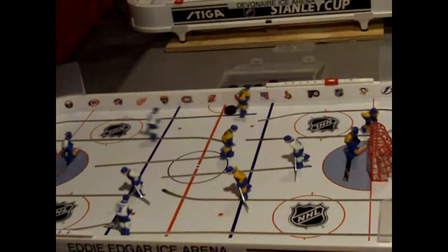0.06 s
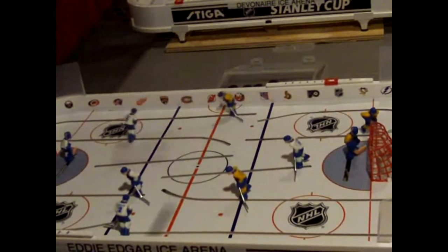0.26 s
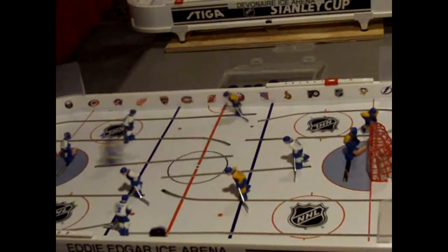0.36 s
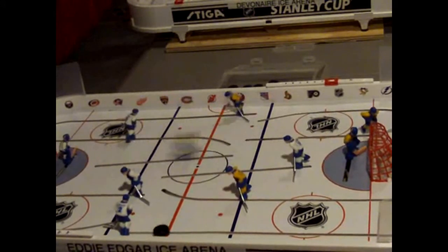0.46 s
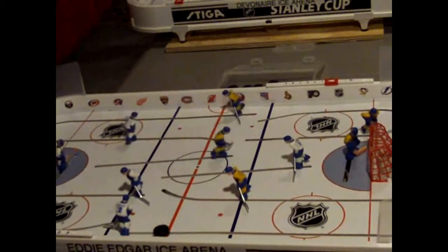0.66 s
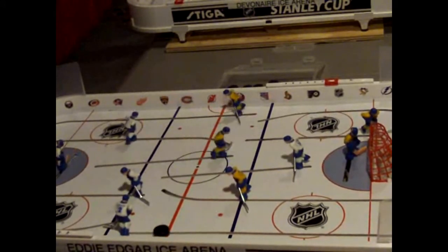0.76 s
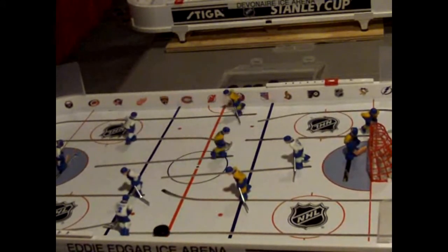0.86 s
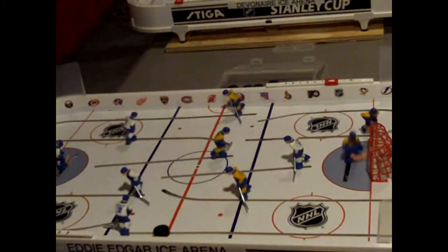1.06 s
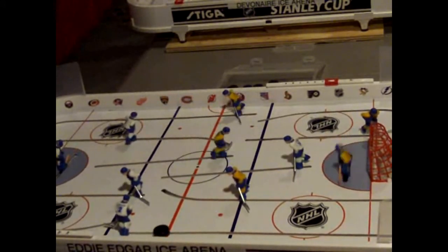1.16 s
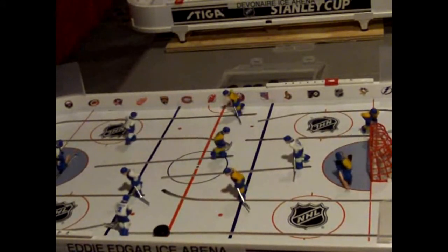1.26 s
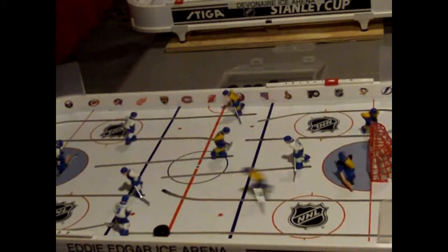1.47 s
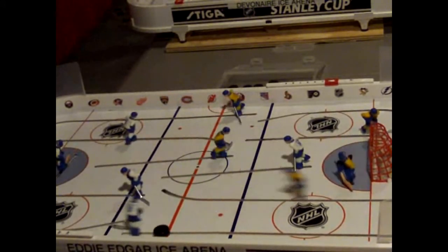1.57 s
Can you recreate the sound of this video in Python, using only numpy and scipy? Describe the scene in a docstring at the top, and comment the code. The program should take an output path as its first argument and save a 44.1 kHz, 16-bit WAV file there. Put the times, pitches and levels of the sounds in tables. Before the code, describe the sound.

Table hockey in a small room: knocks and scraping rods build quickly to one loud puck crack on the boards, then sparse light ticks, small clacks and a firmer cluster of knocks, close microphone, faint hiss.

```python
"""A table hockey game in a small room: players, rods and puck knock on a thin rink sheet, which answers each contact
with a tick and a burst of banded noise that dies away. Sliding rods rub as a stream of tiny random slips.
One hard shot cracks into the boards, which ring as damped sines, and overloads the microphone.
Later the goalie, then a skater, clack against their stops, also as damped sines.
Steady room noise carries a faint high whine, and decaying noise gives the game its reflections."""
import sys
import numpy as np
from scipy import signal
from scipy.io import wavfile

SR = 44100
rng = np.random.default_rng(int(sys.argv[2]) if len(sys.argv) > 2 else 0)


def generate_wav(signal):
    """Clip the signal to [-1, 1] and save it as 16-bit WAV at the path in sys.argv[1]."""
    frames = np.transpose(np.atleast_2d(signal))
    scaled = np.clip(frames, -1, 1) * 32767
    pcm = np.round(scaled).astype(np.int16)
    wavfile.write(sys.argv[1], SR, pcm)


N = 70560
T = np.arange(N) / SR   # s

# Filter bank shared by every noisy sound
EDGES = np.geomspace(30, 17000, 24)   # Hz
CENTRES = np.sqrt(EDGES[1:] * EDGES[:-1])   # Hz
# Where the colour of a contact is set
BASS_HZ, MID_HZ, PRESENCE_HZ, TREBLE_HZ, TOP_HZ = 507, 1320, 2830, 7500, 14000


def from_db(db):
    """Decibels to gain."""
    return 10 ** (np.asarray(db) / 20)


def rms_one(x):
    """Scale to rms 1."""
    return x / np.sqrt(np.mean(x ** 2) + 1e-20)


def decay(age, t60):
    """Exponential fall by 60 dB in t60 seconds."""
    return np.exp(-np.log(1000) * age / t60)


def at_hz(points, hz):
    """Read a table on a log-frequency axis."""
    f, value = np.transpose(points)
    return np.interp(np.log(hz), np.log(f), value)


def band(x, k):
    """The k-th band of the filter bank."""
    sos = signal.butter(2, EDGES[k:k + 2], "band", fs=SR, output="sos")
    return signal.sosfilt(sos, x + 1e-18)


def band_gains(spectrum):
    """Rms of each band for a spectrum of total power 1."""
    gains = from_db(at_hz(spectrum, CENTRES)) * np.sqrt(np.diff(EDGES))
    return gains / np.linalg.norm(gains)


def coloured_noise(sources, gains):
    """Sum of noise bands at the given rms; neighbouring bands take turns on two independent sources."""
    return sum(gain * rms_one(band(sources[k % 2], k)) for k, gain in enumerate(gains))


def contact_colour(bass_db, presence_db, treble_db):
    """Band gains of the rink under a duller or sharper contact."""
    # Colour of the rink sheet. Each row: frequency in Hz, relative density in dB per Hz.
    rink = [(40, -45), (150, -41.5), (240, -40), (340, -21), (480, -3.5), (900, 1.5), (1600, 2), (2700, -2),
            (4200, -7.5), (7500, -14), (11000, -20.5), (15000, -34)]
    # A dull contact keeps falling towards the top
    top_db = treble_db + 0.6 * min(treble_db - presence_db, 0)
    tilt = [(BASS_HZ, bass_db), (MID_HZ, 0), (PRESENCE_HZ, presence_db), (TREBLE_HZ, treble_db), (TOP_HZ, top_db)]
    return band_gains(rink) * from_db(at_hz(tilt, CENTRES))


def strikes(rows):
    """Each contact is a tick and a ring of the sheet's crowded modes, different at every spot."""
    tick = 4   # height of the first contact against the noise of the ring
    treble_ring_share = 0.92   # ring time at the very top against the mids
    t = T[:SR // 4]
    out = np.zeros(N + SR)
    chance = rng.standard_normal((len(rows), 2, len(t)))
    chance[:, :, 0] = tick
    gains = np.array([from_db(db) * contact_colour(*colour) for _, db, *colour, _ in rows])
    t60 = np.maximum([row[-1] for row in rows], 0.01)[:, None]
    rings = 0
    for k, hz in enumerate(CENTRES):
        share = at_hz([(MID_HZ, 1), (SR / 4, treble_ring_share)], hz)
        fall = decay(t, t60 * share)
        wave = band(chance[:, k % 2] * fall, k)
        # A longer ring carries more energy
        size = np.linalg.norm(fall, axis=1) / np.linalg.norm(wave, axis=1)
        rings = rings + wave * (2 * gains[:, k] * size)[:, None]
    for row, wave in zip(rows, rings):
        start = max(int(row[0] * SR), 0)
        out[start:start + len(t)] += wave
    return out[:N]


def ring(modes, start_s):
    """Damped sines set off together in alternating directions by a small part that gives off little bass."""
    age = np.maximum(T - start_s, 0)
    motion = np.zeros(N)
    for k, (hz, db, t60) in enumerate(modes):
        direction = (-1) ** k
        motion += direction * from_db(db) * decay(age, t60) * np.sin(2 * np.pi * hz * age)
    return signal.sosfilt(signal.butter(2, 350, "high", fs=SR, output="sos"), motion)


def knocks():
    """Players, rods and puck knock on the rink sheet, each contact with its own colour."""
    # The knocks of the game. Each row: start in seconds, level before colouring in dB, bass in dB,
    # presence in dB, treble in dB, ring T60 at the mids and below in seconds.
    contacts = [(0.001, -24, -12.5, -9.5, -26, 0.095), (0.013, -33, -9, -3, -29, 0.25),
                (0.058, -45, -12, 1, -22, 0.18), (0.1405, -32, 0.5, -15, -9, 0.15),
                (0.148, -47.5, -7, 9, 10, 0.21), (0.167, -38.5, 7.5, 3, 10.5, 0.063),
                (0.192, -29, 6, 3, 6.5, 0.12), (0.203, -29.5, 5, -1, 1, 0.087),
                (0.226, -31, 10, 6, 7, 0.072), (0.236, -36, 5, -1, 11, 0.082),
                (0.257, -22, -4, -15, -8, 0.05), (0.266, -37.5, -3, -2, 14, 0.071),
                (0.278, -34, 8, -6, 7, 0.075), (0.2895, -20, -5, -4, -5, .06),
                (0.2955, -23, 0, -3, 4.5, 0.077), (0.333, -27, -4, 1, -5, 0.13),
                (0.43, -39, -5, 4.5, -2.5, 0.18), (0.495, -44, 9, -2, -5, 0.16),
                (0.52, -41, 7, 0, -3, 0.066), (0.553, -41, 0, -7, -4, 0.086),
                (0.5726, -35.5, 7.5, 6.5, 4, 0.18), (0.586, -25, 1.5, 2.5, -16, 0.095),
                (0.598, -26.5, 6.5, -7, -9, 0.17), (0.609, -31.5, 1.5, -2, -17, 0.23),
                (0.7163, -43.5, -1, 3, -4, 0.033), (0.741, -47, 1, 2, 6.5, 0.053),
                (0.8016, -43, -4, -1, -11, 0.11), (0.914, -55, 2.5, -10, 5, .07),
                (0.928, -39, 8, -9.5, -18, 0.066), (0.9767, -47, 5, 2.5, 4, 0.077),
                (1.0026, -32.5, 8, 5.5, -2.5, 0.076), (1.0864, -38.5, 2.5, 0, -8, 0.13),
                (1.126, -43, 7.5, 0.5, -5, 0.19), (1.165, -39, 4, -0.5, -11, 0.14),
                (1.2335, -20.5, -9, -4, -14, 0.097), (1.2395, -24.5, -13.5, -4, -6.5, 0.064),
                (1.25, -24, -9.5, -1.5, -22, 0.12), (1.263, -29.5, -4.5, 0, -8, 0.19),
                (1.31, -32.5, -2, -1, -19, 0.12), (1.368, -42, 7, -0.5, -3, 0.18),
                (1.392, -37, 0.5, -0.5, 4.5, 0.11), (1.402, -34, 5.5, 1, -3, 0.068),
                (1.455, -42.5, -2, -1, -7, 0.088), (1.497, -45, -6, -2, -6, .07),
                (1.548, -50.5, 14, 3.5, 4, 0.15)]
    return strikes(contacts)


def rods():
    """Sliding rods feed tiny slips of random size and direction into the rink sheet."""
    # Rubbing of the rods in their slots. Each row: time in seconds, level before colouring in dB.
    slide = [(0, -29), (.13, -51), (.2, -25.5), (.3, -22.5), (.42, -38), (.55, -44.5), (.66, -46),
             (.78, -70), (.9, -51), (1.06, -47.5), (1.18, -37.5), (1.33, -34.5), (1.44, -43.5), (1.52, -44),
             (1.6, -42.5)]
    slips_per_s, spread_db = 2000, 2.5
    bass_db, presence_db, treble_db = -1, -3.5, -5
    sizes = from_db(spread_db * np.minimum(rng.exponential(1, (2, N)), 5))
    directions = rng.choice([-1, 1], (2, N))
    happens = rng.random((2, N)) < slips_per_s / SR
    rub = coloured_noise(sizes * directions * happens, contact_colour(bass_db, presence_db, treble_db))
    return rub * from_db(np.interp(T, *np.transpose(slide)))


def background():
    """Steady room noise with a thin whine whose pitch trembles at random."""
    # Colour of the room noise. Each row: frequency in Hz, relative density in dB per Hz.
    floor = [(30, -28), (120, -24.5), (250, -11.5), (600, 5.5), (1500, 5.5), (3000, 0), (6000, -7),
             (9000, -15.5), (15000, -29)]
    floor_db, whine_db = -51, -63   # rms
    whine_hz, waver_hz = 7870, 60   # pitch and the rms of its trembling
    waver_top_hz = 90   # the trembling is noise below this rate
    white = rng.standard_normal((3, N))
    hiss = coloured_noise(white, band_gains(floor))
    waver = rms_one(signal.sosfilt(signal.butter(2, waver_top_hz, fs=SR, output="sos"), white[2]))
    whine = np.sin(2 * np.pi * np.cumsum(whine_hz + waver_hz * waver) / SR)
    return from_db(floor_db) * rms_one(hiss) + from_db(whine_db) * rms_one(whine)


def shot():
    """The puck cracks into the boards, touches again at once, and leaves them ringing."""
    # Modes of the boards. Each row: frequency in Hz, relative level in dB, T60 in seconds.
    boards = [(562.5, -15, .12), (857, -18, .1), (1026, -21, .16), (1160, -23, 0.13), (1384, -6.5, .19),
              (1422, -15, .24), (1519, -9, .14), (1659, 2.5, .1), (1700, -14, 0.18), (1815, -3, .09),
              (1950, -8, 0.041), (2124, -9, 0.029), (2228, -9, 0.052), (2358, -9, 0.055), (2555, -9, .07),
              (2632, -17, 0.19), (2990, -20, 0.17), (4100, -20, 0.14)]
    start_s, rebound_s = 0.3121, 0.0045
    crack_db, rebound_db, boards_db = -9.5, -3.5, -5   # the rebound is relative to the crack
    colour = (-5, 3, 2, 0.048)   # bass, presence and treble in dB, T60 in s
    touches = [(start_s, crack_db, *colour), (start_s + rebound_s, crack_db + rebound_db, *colour)]
    return strikes(touches) + from_db(boards_db) * ring(boards, start_s)


def players():
    """Hollow clacks as the goalie, then a skater, reach their stops and ring with their rods."""
    # Modes of the goalie and its rod. Each row: frequency in Hz, relative level in dB, T60 in seconds.
    goalie = [(522, -13, 0.13), (635, -5, .12), (693.4, -3, .11), (1050, -8, .06), (1330, 2.5, 0.092),
              (1598, 1, 0.093), (1694, -1, .07), (1935, 4, 0.066), (2270, -0.5, .07), (3300, 4, 0.027),
              (6300, -2.5, 0.035)]
    # Modes of a skater and its rod. Each row: frequency in Hz, relative level in dB, T60 in seconds.
    skater = [(1024, 2, 0.11), (1132, -5, 0.068), (1860, -9, 0.082), (1980, -3.5, 0.08),
              (2360, -3.5, 0.094)]
    goalie_s, goalie_db = 1.003, -32
    skater_s, skater_db = 1.087, -30
    return from_db(goalie_db) * ring(goalie, goalie_s) + from_db(skater_db) * ring(skater, skater_s)


def room(x):
    """Diffuse reflections build up and die away, the low mids slowest and the extreme top fastest."""
    # Reverberation of the room. Each row: frequency in Hz, T60 in seconds.
    room_t60 = [(100, 0.49), (500, 0.56), (1500, 0.35), (5000, 0.41), (14000, 0.25)]
    level_db, delay_s, build_s = -15, 0.007, 0.0059
    t = T[:SR * 3 // 4]
    build_up = np.clip((t - delay_s) / build_s, 0, 1)
    white = rng.standard_normal((2, len(t))) * build_up
    tail = sum(band(white[k % 2] * decay(t, at_hz(room_t60, hz)), k) for k, hz in enumerate(CENTRES))
    return from_db(level_db) * signal.fftconvolve(x, tail / np.linalg.norm(tail))[:N]


def scene():
    """The game, its reflections and the room noise."""
    game = knocks() + rods() + shot() + players()
    return (game + room(game) + background())[None]


def record(dry):
    """The microphone bends softly into its ceiling; the upper bass is thinned and the top is cut."""
    ceiling = 1.0
    dip_edges_hz, dip_share = (90, 200), 0.5
    cutoff_hz = 15300
    held = dry / (1 + (dry / ceiling) ** 6) ** (1 / 6)
    bass = signal.sosfilt(signal.butter(1, dip_edges_hz, "band", fs=SR, output="sos"), held)
    thinned = held - dip_share * bass
    return signal.sosfilt(signal.ellip(12, 0.1, 90, cutoff_hz, fs=SR, output="sos"), thinned)


dry = scene()
out = record(dry)
generate_wav(out)
```